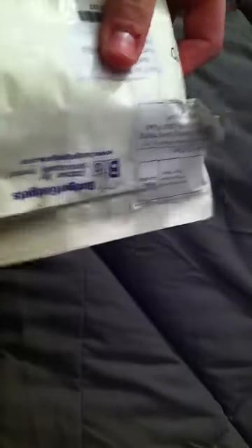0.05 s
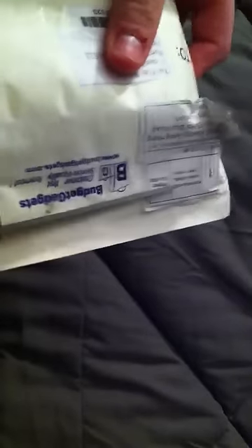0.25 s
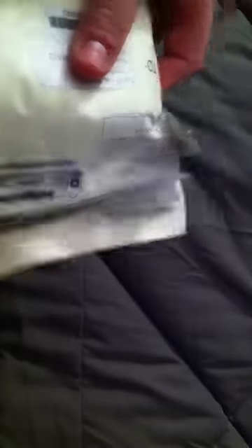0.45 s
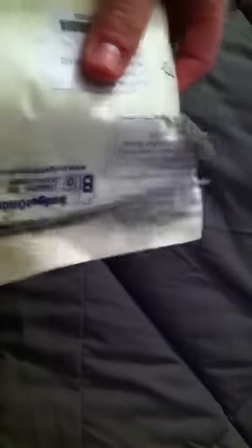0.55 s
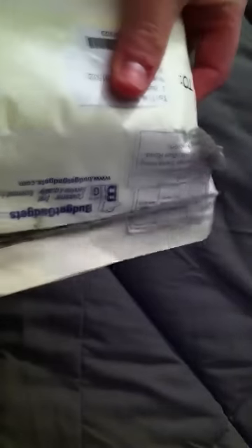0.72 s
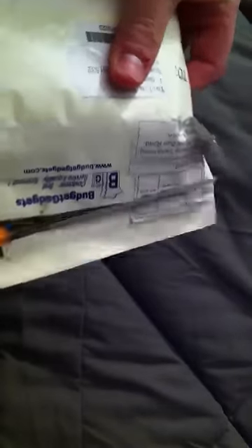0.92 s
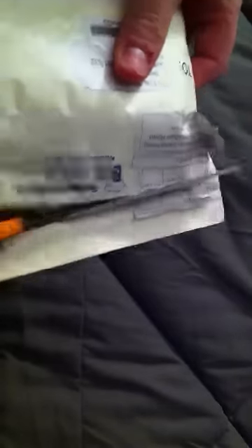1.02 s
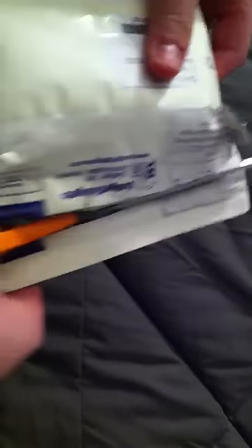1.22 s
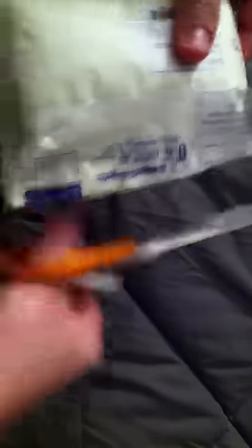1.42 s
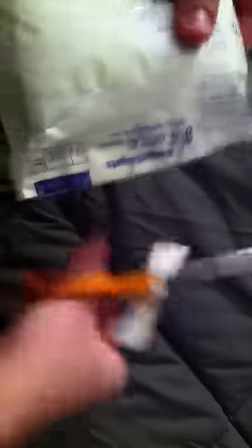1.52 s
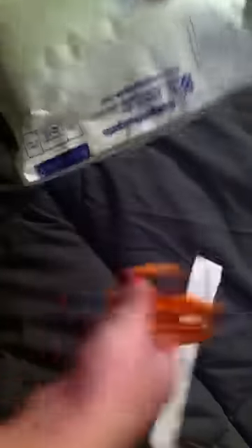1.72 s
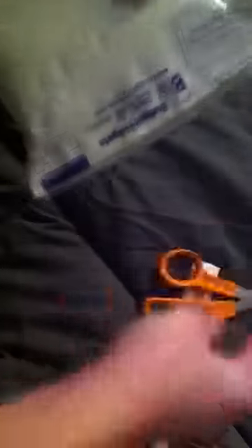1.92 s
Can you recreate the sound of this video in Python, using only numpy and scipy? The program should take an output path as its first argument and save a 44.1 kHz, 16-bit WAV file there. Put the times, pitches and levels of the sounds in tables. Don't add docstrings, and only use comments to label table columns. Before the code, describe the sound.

Crisp crinkling and snapping of a plastic-lined mailer being handled and cut open, close up

```python
import sys
import numpy as np
from scipy import signal
from scipy.fft import rfft, irfft
from scipy.io import wavfile
from scipy.ndimage import uniform_filter1d

SR = 44100
rng = np.random.default_rng(int(sys.argv[2]) if len(sys.argv) > 2 else 0)


def wav_record(signal):
    frames = np.transpose(np.atleast_2d(signal))
    bounded = np.clip(frames, -1, 1)
    quanta = np.round(bounded * 32767).astype(np.int16)
    wavfile.write(sys.argv[1], SR, quanta)


def voltage_ratio(level):
    return 10 ** (np.asarray(level, float) / 20)


N = 85995

# low edge in Hz, high edge in Hz.
PART_BANDS_HZ = [(60, 600), (550, 2500), (2400, 6000), (5600, 18000)]
# start in s, rise in s, fall in s, peak in dB,
# colour in octaves above 300 Hz.
CRUMPLE_MOVES = [(.19, 0.13, 0.033, -40.5, 3), (.244, 0.0093, 0.023, -23.5, 3),
                 (.274, 0.011, 0.0062, -21, 4), (.2965, 0.0017, 0.01, -17.5, 3),
                 (.31, 0.036, 0.017, -46.5, 4.5), (.501, 0.0072, 0.0038, -28, 2.5),
                 (.638, 0.0015, 0.023, -37.5, 1.5), (.72, 0.0084, 0.03, -41, 4.5),
                 (.814, 0.014, 0.013, -24.5, 2), (.841, 0.0064, 0.0029, -25, 4.5),
                 (.853, 0.0049, 0.058, -45, -2.5), (1.3, 0.015, 0.14, -53, 0.2),
                 (1.384, 0.012, 0.024, -37, 3), (1.405, .015, 0.017, -51, 6.5),
                 (1.439, .007, 0.0089, -32, 5.5), (1.46, 0.017, 0.11, -42, 11),
                 (1.49, 0.072, 0.062, -58, -1), (1.74, 0.002, 0.016, -53.5, 3.5),
                 (1.92, 0.03, .02, -51, -0.5), (1.94, 0.0093, 0.015, -49, 4),
                 (.762, 0.0021, 0.0034, -38.5, 4), (.78, 0.021, 0.012, -50, 5),
                 (1.05, 0.013, 0.014, -50, 2), (1.847, 0.0028, 0.013, -59, 2),
                 (1.57, 0.031, 0.057, -53, -3.5), (.05, 0.043, 0.031, -51.5, 2.5)]
# start in s, rise in s, fall in s, peak in dB,
# colour in octaves above 300 Hz.
RUB_MOVES = [(.0, 0.0079, 0.13, -54, 2), (.035, 0.087, 0.033, -39.5, 3.34),
             (.44, 0.062, 0.006, -42.5, 2.53), (.505, 0.0033, 0.15, -34, 3.66),
             (.562, .02, 0.064, -31, 3.9), (.62, 0.07, 0.048, -42, 2.2), (.68, 0.044, 0.067, -37, 3.04),
             (.88, 0.004, 0.051, -51, 5.7), (.965, 0.017, 0.027, -50, 2.2), (1.0, 0.018, 0.32, -44.5, 2.8),
             (1.115, 0.042, 0.044, -37.5, 3.6), (1.22, 0.083, 0.042, -54, 2.14),
             (1.36, 0.018, 0.0097, -47.5, 1.9), (1.67, 0.029, 0.02, -52.5, 3.8),
             (1.76, 0.022, 0.046, -59, 3.8)]


def unit(x):
    return x / np.sqrt(np.mean(x ** 2))


def flutter(size):
    smooth = uniform_filter1d(rng.standard_normal(N), size=size)
    return unit(uniform_filter1d(smooth, size=size))


def clicks(per_s, scatter_db):
    when, sign, size = rng.random((3, N))
    size_db = scatter_db * np.minimum(-np.log(1 - size), 1.6)
    return unit((when < per_s / SR) * np.sign(sign - 0.5) * voltage_ratio(size_db))


def gestures(moves):
    fall_db_per_octave = 3.5
    t = np.arange(N) / SR
    centre_hz = np.sqrt(np.prod(PART_BANDS_HZ, axis=1))
    octave = np.log2(centre_hz / 300)[:, None]
    power = np.zeros((4, N))
    for start_s, rise_s, fall_s, db, colour in moves:
        up = np.clip((t - start_s) / rise_s, 0, 1)
        down = np.clip((t - start_s - rise_s) / fall_s, 0, 1)
        level = voltage_ratio(db - fall_db_per_octave * abs(octave - colour))
        power += (up ** 0.59 * (1 - down) ** 1.37 * level) ** 2
    return np.sqrt(power)


def ring(x, modes, column):
    out = 0
    for k, mode in enumerate(modes):
        hz, width_hz = mode[0], mode[1]
        b, a = signal.iirpeak(hz, hz / width_hz, SR)
        out = out + (-1) ** k * voltage_ratio(mode[column]) * signal.lfilter(b, a, x)
    return out


def parts(drives, column):
    # frequency in Hz, width in Hz, level snapped in dB, level rubbed in dB.
    pocket_modes = [(208, 170, -10.5, -10.5), (381, 125, -2, 10)]
    sheet_modes = [(804, 430, 1, -1.5), (1327, 435, 1.5, -1.5), (2197, 560, -0.5, -4)]
    fold_modes = [(2685, 2210, -1, -8.5), (4870, 2110, 0.85, -5)]
    film_modes = [(6620, 560, 0, -2), (8500, 1960, 1.5, 2), (11130, 7700, -7.5, -7.5)]
    out = []
    for drive, modes, band_hz in zip(drives, (pocket_modes, sheet_modes, fold_modes, film_modes), PART_BANDS_HZ):
        sos = signal.butter(1, band_hz, "band", fs=SR, output="sos")
        out.append(signal.sosfilt(sos, ring(drive, modes, column)))
    return out


def air():
    # frequency in Hz, density in dB per Hz.
    hiss_spectrum = [(24, 11), (45, -13), (90, -3.5), (372, 1.5), (800, -11.5), (2700, -9.5), (9450, -13.5),
                     (16000, -17.5)]
    level_db, flicker_db = -62, 1.2
    hz = np.arange(N // 2 + 1) * SR / N + 1
    table_hz, table_db = np.transpose(hiss_spectrum)
    shape = voltage_ratio(np.interp(np.log(hz), np.log(table_hz), table_db))
    hiss = unit(irfft(rfft(rng.standard_normal(N)) * shape, N))
    return voltage_ratio(level_db + flicker_db * flutter(700)) * hiss


def knock():
    # frequency in Hz, level in dB, T60 in seconds.
    handle_modes = [(294, -77, 0.057), (423, -60, 0.075), (770, -50, 0.071), (883, -34, 0.022),
                    (1170, -34.5, 0.0084), (1800, -49, 0.0092)]
    t = np.maximum(np.arange(N) / SR - 1.7378, 0)
    return sum(voltage_ratio(db - 60 * t / t60_s) * np.sin(2 * np.pi * hz * t) for hz, db, t60_s in handle_modes)


def puffs():
    b, a = signal.butter(2, 45, fs=SR)
    rumble = unit(signal.lfilter(b, a, rng.standard_normal(N)))
    push = gestures(CRUMPLE_MOVES)[2] + 0.64 * gestures(RUB_MOVES)[2]
    return voltage_ratio(-15.5) * push * rumble


def rubs():
    level_db, flicker_db = 7.5, 3.5
    wander = np.array([flutter(200) for _ in range(4)])
    ticks = clicks(per_s=7000, scatter_db=2)
    drives = voltage_ratio(level_db + flicker_db * wander) * gestures(RUB_MOVES) * ticks
    return sum(parts(drives, column=3))


def crumples():
    part_db = (24.3, 11.86, 8.6, 9.3)
    clump_db, together = 2.5, 0.14
    ticks = np.array([clicks(per_s=5000, scatter_db=4) for _ in range(5)])
    level = voltage_ratio(np.array(part_db)[:, None] + clump_db * flutter(70))
    drives = level * gestures(CRUMPLE_MOVES) * (together * ticks[4] + ticks[:4])
    return sum(parts(drives, column=2))


def snaps():
    # time in seconds, pocket in dB, sheet in dB, folds in dB, film in dB.
    grip_snaps = [(0.0522, -54, -47, -37, -31), (0.1185, -50, -34, -33, -31), (0.1478, -66, -49, -46, -38),
                  (0.1505, -64, -33, -31, -50), (0.1783, -70, -58, -45, -51), (0.2126, -52, -45, -35, -34),
                  (0.2157, -47, -35, -32, -35), (0.2441, -30, -13, -11, -13), (0.2577, -33, -18, -13, -21),
                  (0.2779, -29, -16, -16, -19), (0.2821, -28, -12, -8, -9), (0.2866, -26, -20, -19, -19),
                  (0.3, -25, -11, -5, -17), (0.3036, -26, -23, -18, -16), (0.3072, -39, -22, -17, -25),
                  (0.3391, -45, -28, -29, -29), (0.4331, -69, -60, -46, -46), (0.4467, -59, -44, -45, -53),
                  (0.4621, -52, -41, -49, -47), (0.5045, -41, -24, -25, -21), (0.6378, -46, -23, -18, -33),
                  (0.6688, -46, -31, -25, -35), (0.6726, -55, -37, -29, -23), (0.7347, -43, -30, -22, -30)]
    slit_snaps = [(0.7655, -46, -39, -37, -41), (0.7981, -51, -42, -44, -47), (0.8259, -31, -14, -19, -16),
                  (0.8422, -36, -24, -18, -17), (0.8466, -30, -16, -20, -21), (0.8491, -29, -14, -11, -20),
                  (0.8586, -42, -27, -33, -36), (1.195, -50, -44, -46, -52), (1.3248, -48, -34, -39, -57),
                  (1.3922, -26, -24, -24, -27), (1.3945, -26, -22, -22, -29), (1.4037, -39, -33, -27, -34),
                  (1.4464, -35, -30, -21, -27), (1.454, -36, -34, -11, -9), (1.4574, -35, -36, -24, -26),
                  (1.483, -51, -46, -34, -21), (1.5699, -50, -60, -54, -49), (1.7066, -66, -52, -47, -51),
                  (1.8513, -54, -48, -50, -62), (1.898, -56, -62, -55, -54), (1.9342, -48, -44, -52, -56),
                  (1.9479, -41, -31, -29, -31)]
    small_snaps = [(0.2281, -52, -38, -38, -53), (0.2321, -47, -43, -31, -46), (0.2392, -42, -31, -30, -37),
                   (0.2495, -40, -24, -16, -26), (0.2523, -50, -21, -17, -24), (0.261, -30, -20, -16, -24),
                   (0.2628, -33, -35, -20, -30), (0.266, -42, -28, -23, -30), (0.2682, -46, -21, -25, -31),
                   (0.2719, -39, -26, -22, -31), (0.315, -53, -35, -33, -37), (0.3294, -48, -37, -33, -32),
                   (0.3365, -43, -31, -32, -34), (0.4717, -60, -44, -38, -41), (0.4747, -62, -53, -42, -36),
                   (0.4823, -64, -44, -42, -46), (0.5149, -45, -33, -31, -31), (0.5179, -59, -38, -29, -31),
                   (0.5638, -56, -47, -33, -40), (0.5782, -48, -37, -31, -29), (0.5816, -53, -39, -35, -25),
                   (0.5996, -56, -42, -32, -33), (0.6114, -56, -45, -40, -32), (0.6533, -52, -39, -38, -42),
                   (0.7095, -52, -39, -33, -38), (0.7268, -53, -44, -34, -27), (0.729, -57, -40, -33, -28),
                   (0.7385, -40, -37, -29, -29), (0.7441, -52, -41, -36, -36), (0.8187, -39, -29, -31, -26),
                   (0.8234, -33, -17, -17, -18), (0.8323, -34, -27, -25, -25), (1.1573, -55, -35, -32, -32),
                   (1.3644, -63, -55, -48, -49), (1.4496, -48, -26, -31, -26), (1.9418, -48, -46, -39, -38)]
    trim_db = (-1.33, -1.5, 0.6, -1.9)
    t60_s, first_tick, length = 0.0089, 5.5, 2048
    rows = np.array(list(grip_snaps) + list(slit_snaps) + list(small_snaps))
    rattle = rng.standard_normal((len(rows), length)) * voltage_ratio(-60 * np.arange(length) / SR / t60_s)
    rattle[:, 0] = first_tick
    rung = 0
    for k, part in enumerate(parts([rattle] * 4, column=2)):
        peak = abs(part).max(axis=1, keepdims=True)
        rung = rung + part / peak * voltage_ratio(rows[:, [k + 1]] + trim_db[k])
    out = np.zeros(N + length)
    for start_s, snap in zip(rows[:, 0], rung):
        i = int(start_s * SR)
        out[i:i + length] += snap
    return out[:N]


def scene():
    room_t60_s, room_db, room_top_hz = 0.2, -18, 6000
    near = snaps() + crumples() + rubs() + puffs() + knock()
    t = np.arange(SR // 2) / SR
    tail = rng.standard_normal(len(t)) * voltage_ratio(-60 * t / room_t60_s) * (t > 0.003)
    b, a = signal.butter(1, room_top_hz, fs=SR)
    tail = signal.lfilter(b, a, tail)
    tail = tail / np.sqrt(np.sum(tail ** 2))
    room = voltage_ratio(room_db) * signal.fftconvolve(near, tail)[:N]
    return (near + room + air())[None]


def band_limit(x):
    return signal.sosfilt(signal.butter(12, 16820, fs=SR, output="sos"), x)


def record(dry):
    # start in seconds, length in seconds, gain in dB.
    gain_steps = [
        (0.809, 0.0078, -14.5),
        (1.431, 0.0016, 5),
    ]
    t = np.arange(N) / SR
    gain_db = np.zeros(N)
    for start_s, length_s, db in gain_steps:
        gain_db += db * ((t > start_s) & (t < start_s + length_s))
    gain_db = uniform_filter1d(gain_db, size=60)
    bass_cut = signal.butter(2, 146, "high", fs=SR, output="sos")
    top_cut = signal.ellip(8, 0.3, 60, 15800, fs=SR, output="sos")
    mix = signal.sosfilt(bass_cut, dry * voltage_ratio(gain_db))
    mix = signal.sosfilt(top_cut, mix)
    return band_limit(mix)


dry = scene()
out = record(dry)
wav_record(out)
```